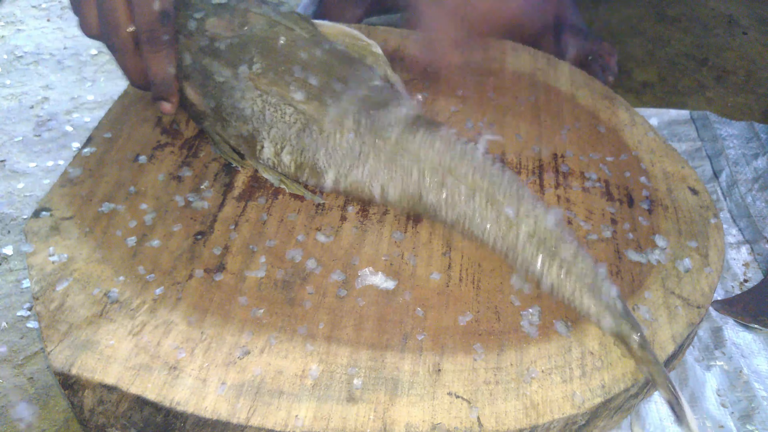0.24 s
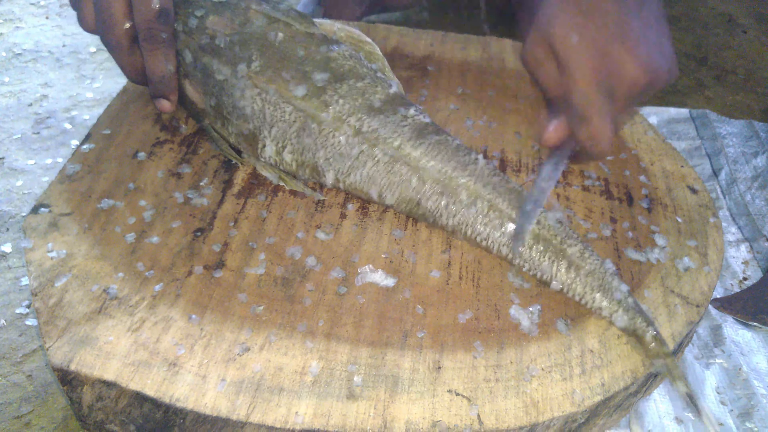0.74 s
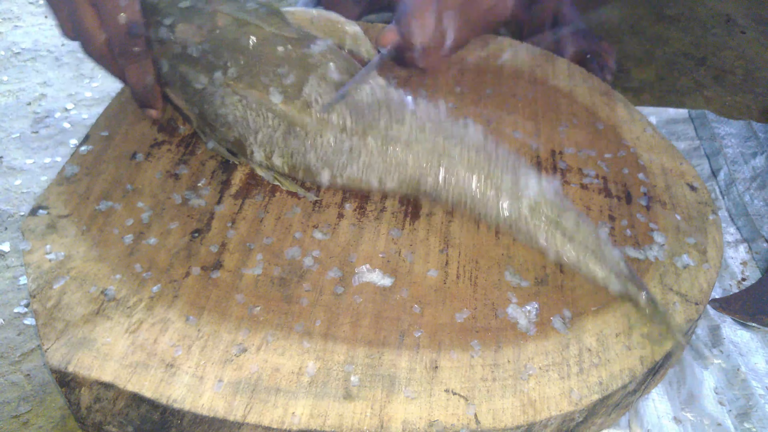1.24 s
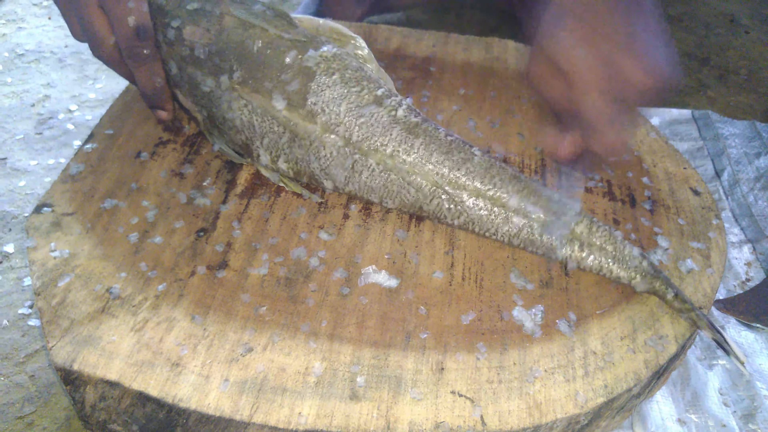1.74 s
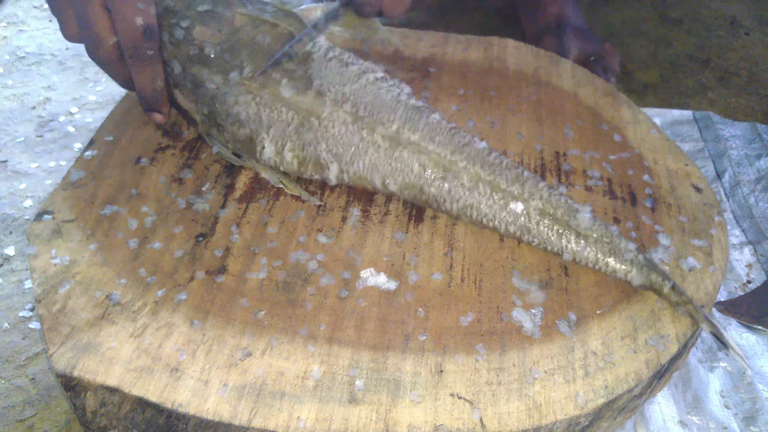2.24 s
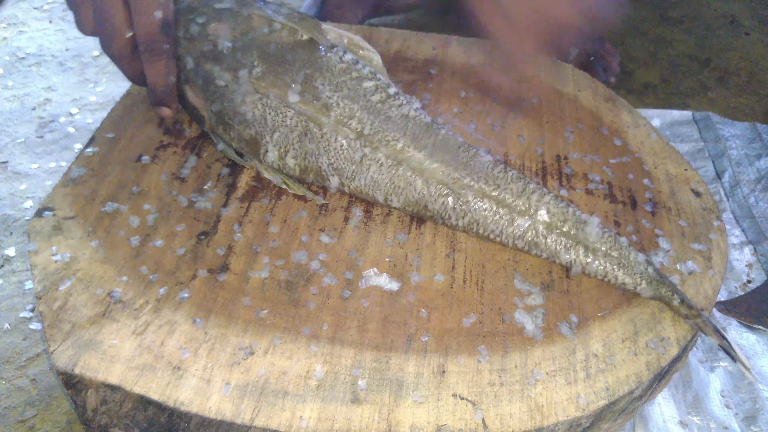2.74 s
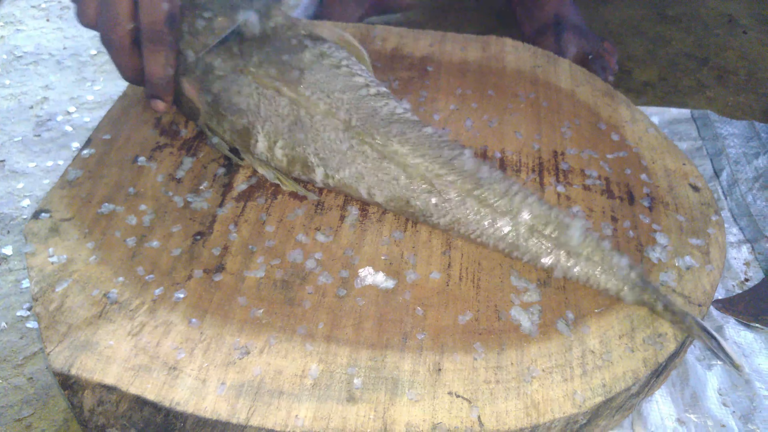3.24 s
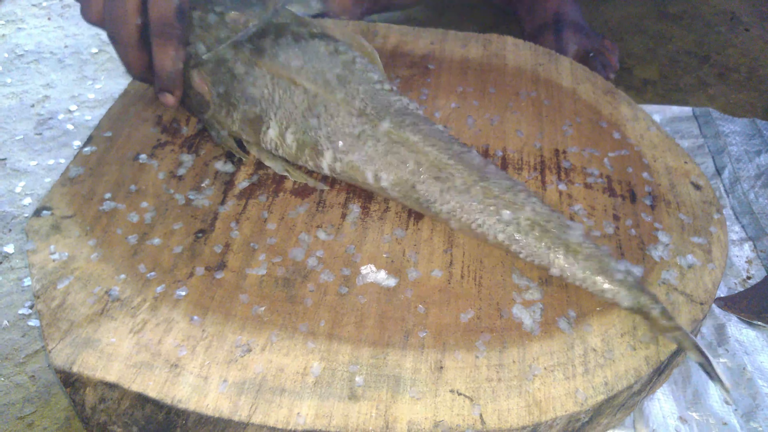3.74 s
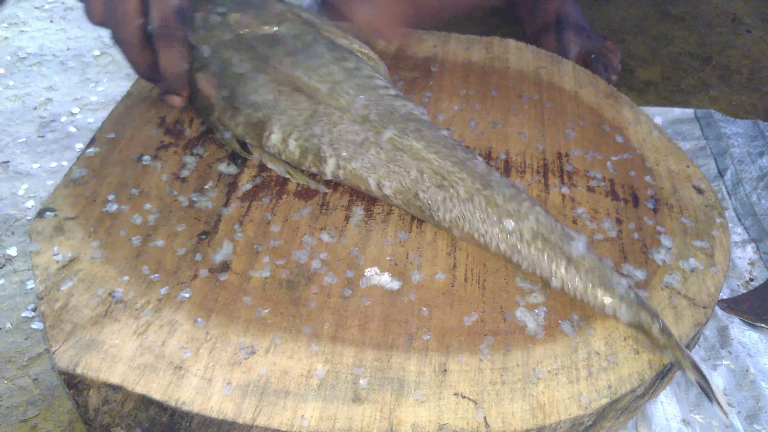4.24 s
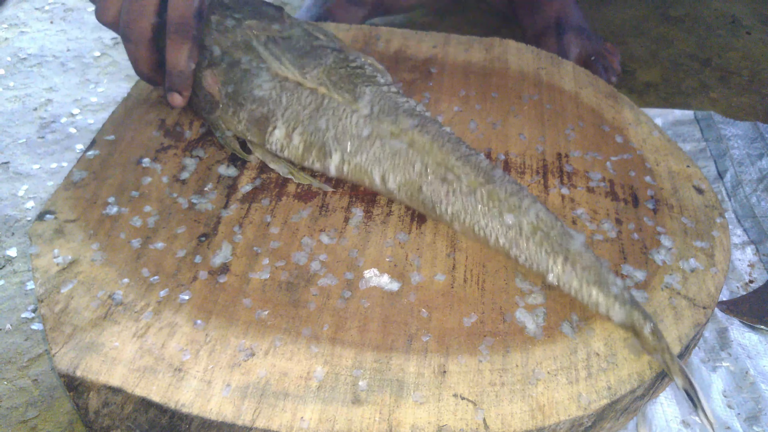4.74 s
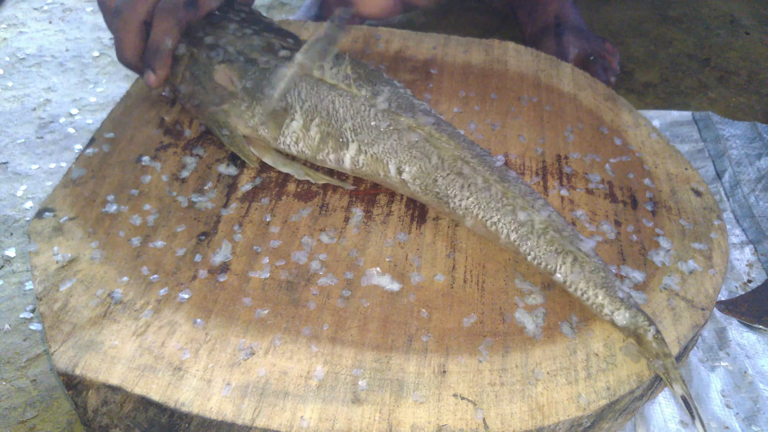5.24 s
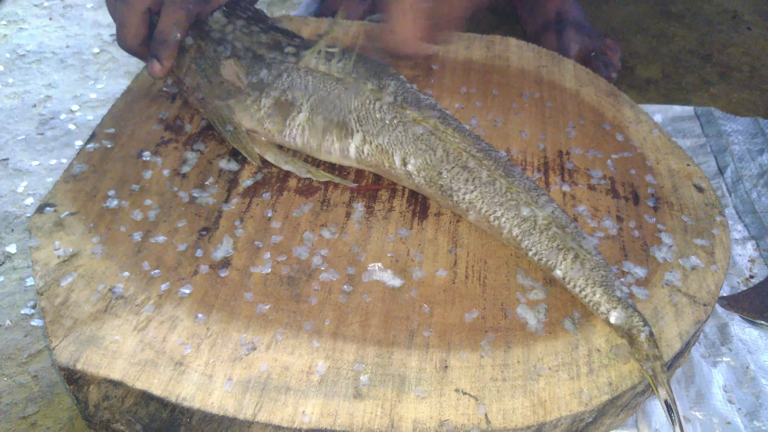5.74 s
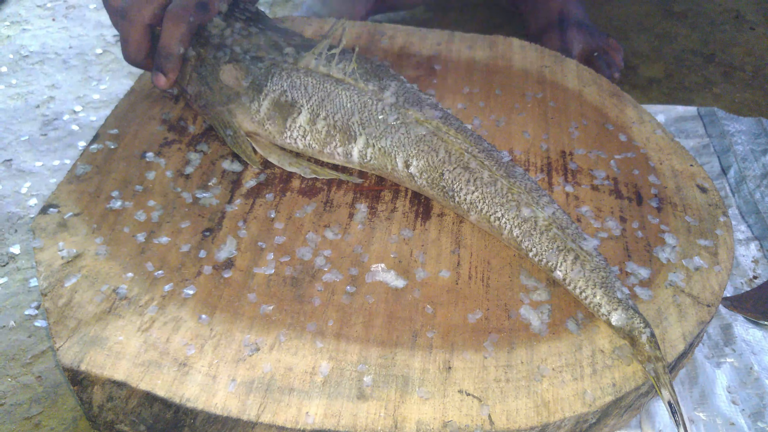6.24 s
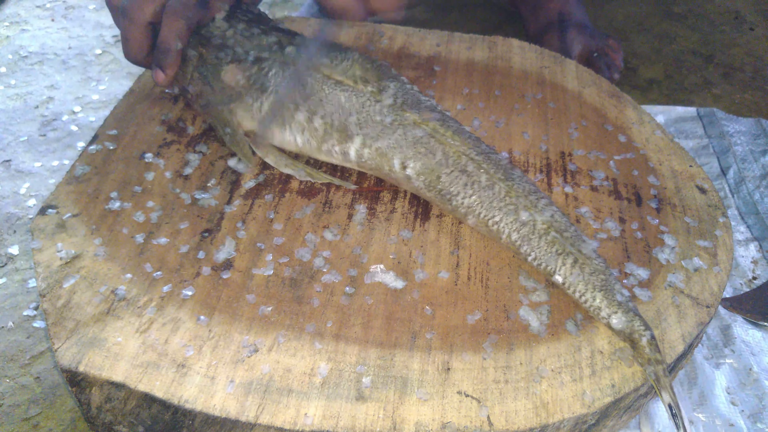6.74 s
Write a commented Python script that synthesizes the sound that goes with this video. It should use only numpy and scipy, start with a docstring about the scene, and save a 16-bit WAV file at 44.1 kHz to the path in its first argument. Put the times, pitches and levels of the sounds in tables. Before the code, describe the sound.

Brisk, dry, crackling scrapes begin at once: each swells, bites for a moment and releases, followed by a lighter, smoother slide back. The wooden block answers with short low knocks and muffled grumbling, while individual scales click sharply. Near the end come knocks, a gap with soft rubbing, and two last gritty pulls. Near, wide stereo microphones outdoors, little echo, quiet bassy air behind.

```python
"""Outdoors, at a thick wooden block: a blade scrapes scales off a fish, about three strokes a second.
Tearing scales are dense noise grains and short ticks; the same strokes drive a dull noise in the block.
Landings of the blade ring the block's modes; single scales snap as a click over a sagging twang.
Rubbing and air are coloured noise. Two spaced microphone ports hear it; the recorder widens the
stereo picture by a delayed cross-feed."""
import sys
import numpy as np
from scipy import signal
from scipy.fft import rfft, irfft, next_fast_len
from scipy.io import wavfile
from scipy.ndimage import uniform_filter1d, map_coordinates

SR = 44100
rng = np.random.default_rng(int(sys.argv[2]) if len(sys.argv) > 2 else 0)


def persist_wave(psi):
    """Save psi, clipped to +-1, as 16-bit WAV."""
    counts = np.round(np.clip(psi, -1, 1) * 32767).astype(np.int16)
    wavfile.write(sys.argv[1], SR, np.atleast_2d(counts).T)


N = 307818

# Pulls against the scales. Each row: full bite in seconds, rise in seconds per RAMP_DB, hold in seconds,
# crackle at the end of the hold in dB, swell over the hold in dB, treble in dB before the bite darkens it,
# block share in dB before a common trim.
PULL_ROWS = [(0.066, 0.073, 0.045, -29, 4, 4, -3.5), (0.33, 0.048, 0.048, -28, 5, 6, -2),
             (0.616, 0.037, 0.063, -33.5, 3.5, 3.5, -3), (0.92, 0.07, 0.092, -36.5, 3.5, 5.5, -3.5),
             (1.263, 0.046, 0.048, -36, 0.5, 7, -4), (1.549, 0.053, 0.075, -32.5, 4.5, 6, -2.5),
             (1.879, 0.09, 0.12, -34, -2.5, 3, -1.5), (2.244, 0.086, 0.071, -28.5, -2.5, 4.5, 0.5),
             (2.59, 0.083, 0.051, -26, 4, 4, -4), (2.652, 0.015, 0.0089, -30, -7, 3, -1.5),
             (2.934, 0.073, 0.065, -32.5, -2.5, 2.5, -3.5), (3.243, 0.022, 0.077, -31.5, 7, 3, -2),
             (3.557, 0.12, 0.027, -36, 0.5, 7.5, -3), (3.774, 0.055, 0.0086, -33.5, -3.5, 7, -1.5),
             (3.995, 0.12, 0.013, -29.5, 8.5, 3, 1), (4.214, 0.024, 0.038, -35, 3, 7.5, -0.5),
             (4.459, 0.052, 0.02, -31.5, 0.5, 7.5, 3.5), (4.758, 0.0061, 0.074, -42.5, -9.5, -3.5, -1),
             (5.136, 0.043, 0.058, -37, -2.5, -1, -1.5), (5.494, 0.014, 0.052, -42, 5.5, 7.5, -3),
             (5.849, 0.044, 0.051, -32, 8, 3, -3.5), (6.585, 0.093, 0.057, -31, 7.5, -2, -10),
             (6.847, 0.12, 0.028, -32.5, 8.5, 1, -5)]
# Light slides back along the fish. Each row: start of hold in seconds, hold in seconds, crackle in dB,
# treble in dB and block share in dB, as for the pulls.
SLIDE_ROWS = [(0.203, 0.063, -48.5, 8, -7), (0.488, 0.045, -46.5, 5, -3), (0.739, 0.086, -47, 0, -7.5),
              (0.803, 0.042, -53.5, 19, 12), (1.094, 0.052, -55.5, 17.5, 2), (1.437, 0.043, -47, 5.5, 0),
              (1.724, 0.061, -49, 14, 8.5), (2.051, 0.097, -46.5, 7.5, -1), (2.4, 0.12, -48.5, 5.5, -21),
              (2.767, 0.085, -51.5, 14, -10), (3.044, 0.13, -49.5, 1, -23), (3.411, 0.039, -44.5, 3, -8),
              (3.671, 0.035, -48.5, 11.5, -1), (3.873, 0.023, -44, 6, -10), (4.096, 0.051, -50.5, 16, -19),
              (4.332, 0.057, -48.5, 10.5, -6), (4.591, 0.078, -45.5, 5, -21), (4.697, 0.034, -45, -2, 2),
              (4.82, 0.092, -48, 1, -5), (5.309, 0.011, -42, -4, 1), (6.432, 0.19, -58.5, 8, 14),
              (6.724, 0.031, -47, 1, -24)]
# Landings of the blade. Each row: start in seconds, level in dB and hardness in dB, before common trims.
KNOCK_ROWS = [(0.227, -8, -9.5), (0.491, -14.5, -4.5), (0.715, -24, -20), (1.111, -22.5, -21),
              (1.233, -19.5, -17), (1.441, -9, -10.5), (1.7271, -6, -11), (2.079, -10, -17),
              (2.186, -7, -14), (2.357, -18.5, 0.5), (2.419, -10.5, -12.5), (2.524, -21, -8),
              (2.702, -21, -26), (2.798, -17, -23.5), (3.142, -13.5, -14), (3.31, -17, -21),
              (3.471, -17.5, -20), (3.71, -11.5, -12), (3.816, -21, -14), (3.928, -18, -17.5),
              (4.037, -18, -1.5), (4.155, -21.5, -23), (4.377, -15, -21), (4.653, -13.5, -16),
              (4.927, -17.5, -21.5), (5.322, -7.5, 6), (5.337, -9, -20.5), (5.383, -16.5, -14),
              (5.666, -8, -6), (5.678, -12.5, -9), (5.716, -16.5, -14), (6.76, -17.5, -11)]
# Single scales snapping. Each row: start in seconds, level in dB before a common trim, nominal pitch in Hz,
# click over twang in dB before a common trim, nominal decay by 60 dB in seconds.
SNAP_ROWS = [(0.073, -8.5, 3140, 13, 0.0052), (0.089, -14.5, 805, 17, 0.022),
             (0.093, -17, 3900, 18, 0.0048), (0.112, -25, 3620, 15, 0.0045),
             (0.1303, -12, 3700, 19.5, 0.0082), (0.324, -23, 3820, 20, 0.0068),
             (0.344, -17, 3660, 22, 0.0059), (0.386, -18, 3500, 23, 0.0066),
             (0.747, -22.5, 3600, 7, 0.0091), (0.8253, -17.5, 1530, 13, 0.0074),
             (0.8414, -0.5, 1317, 12, 0.0058), (0.8472, -15, 1190, 9, 0.0058),
             (1.24, -31, 3460, 22.5, 0.007), (1.302, -20, 3600, 13, 0.0066),
             (1.541, -21.5, 830, 15.5, 0.0061), (1.841, -16.5, 3200, 12, 0.0048),
             (1.893, -24, 794, 13.5, 0.0054), (1.98, -16, 3300, 12, 0.0052), (1.988, -18, 3600, 8, 0.0046),
             (2.318, -18, 840, 23, 0.0095), (2.945, -14.5, 3540, 26.5, 0.0078),
             (2.996, -13, 3430, 22.5, 0.011), (3.051, -24.5, 3500, 20, 0.011),
             (3.242, -27.5, 3500, 27, 0.0042), (3.314, -16.5, 860, 23, 0.014),
             (3.563, -13, 5800, 20, 0.0054), (3.581, -15.5, 5670, 15, 0.0074),
             (3.755, -34, 910, 11, 0.0078), (3.782, -11, 6030, 16, 0.009), (3.867, -10.5, 3150, 7, 0.0094),
             (4.214, -22.5, 3600, 17, 0.0075), (4.247, -20, 900, 25, 0.0089),
             (4.448, -13.5, 1490, 14, 0.0075), (4.505, -10, 6300, 17.5, 0.007),
             (4.761, -19.5, 1290, 20.5, 0.01), (4.822, -21, 1220, 18, 0.013), (5.128, -21, 2950, 5, 0.0074),
             (5.155, -18.5, 4100, 11, 0.0062), (5.268, -24, 3440, 18, 0.0084),
             (5.285, -25, 3200, 14.5, 0.0068), (5.542, -29, 3440, 26.5, 0.0094),
             (5.899, -13, 3830, 16, 0.012), (5.932, -24, 826, 25, 0.014), (6.575, -21, 3640, 10, 0.0092),
             (6.596, -15.5, 3470, 14, 0.01), (6.6, -12, 780, 19.5, 0.0096), (6.632, -13, 3500, 22, 0.0075),
             (6.87, -11.5, 3080, 8, 0.015), (6.884, -17.5, 880, 28.5, 0.0043)]
# Fish and hand shifting on the block. Each row: time in seconds, level in dB.
RUBBING_LEVEL = [(0.0, -32), (0.09, -45), (0.78, -57), (1.34, -50.5), (1.79, -41), (2.41, -39),
                 (2.82, -41.5), (2.99, -47.5), (3.96, -49.5), (4.29, -41), (4.72, -53.5), (4.86, -44.5),
                 (5.23, -41.5), (5.52, -57), (6.02, -40), (6.18, -45), (6.46, -40), (6.73, -44),
                 (6.98, -58)]
# Block modes, low to high. Each row: mean pitch in Hz, level in dB before tilt and scatter, t60 in seconds.
BLOCK_MODES = [(108, -5.5, 0.14), (209.7, 7.5, 0.06), (285.7, 1, 0.059), (363, 1, 0.033), (494.2, 1, 0.17),
               (537, -21, 0.17), (613, -23, 0.12), (748, -12, 0.08)]
# Short slap and high modes of a hard landing. Each row: as for the block modes.
EDGE_MODES = [(463, 12.5, 0.0068), (1020, -11.5, 0.015), (1230, -10, 0.0073), (1530, -7, 0.013),
              (2210, -9, 0.0084)]
# Noise spectra of tearing scales, block, rubbing and air. Each row: frequency in Hz, relative dB per Hz.
CRACKLE_SPECTRUM = [(300, -29), (900, 0), (1600, -2.5), (2500, -3), (3600, 0.5), (5000, -5.5), (6000, -10),
                    (9000, -11), (12500, -13.5), (15000, -21)]
BODY_SPECTRUM = [(50, -70), (100, 8.5), (200, 2), (500, 5), (850, -2.5), (1300, -13.5), (2200, -25.5),
                 (4000, -107)]
RUBBING_SPECTRUM = [(40, -7), (100, 5.5), (250, 0), (500, -6), (1000, -12.5), (1800, -20), (4000, -40)]
AIR_SPECTRUM = [(30, -22), (100, 15.5), (500, -7), (1500, -16.5), (3500, -14), (7000, -18.5), (15000, -31)]
# Likeness of the two ports. Each row: frequency in Hz, likeness from 0 to 1.
PORT_LIKENESS = [(60, 0.91), (550, 0.95), (1000, 0.5), (1700, 0.59), (2300, 0.31), (2700, 0.36),
                 (3800, 0.42), (4800, 0.35), (5400, 1), (6500, 0.083), (15000, 0.08)]
# Level difference of the ports. Each row: frequency in Hz, left minus right in dB.
PORT_TILT = [(60, -4), (500, -2.5), (1050, -4.5), (1500, 7), (2250, -5), (2600, 9), (3800, -5), (6000, -5),
             (15000, -2.5)]
# Phase difference of the ports. Each row: frequency in Hz, lead of the left in radians.
PORT_LEAD = [(500, 0.32), (700, 0.61), (1400, 1.57), (2070, 4.9), (2600, 7.6), (3450, 4.77), (3800, 3.46),
             (4450, 1.97)]
# Cross-feed. Each row: frequency in Hz, share of the other side taken away.
CROSS_SHARE = [(100, 0.47), (1200, 0.39), (2540, 0.9), (3700, 0.82), (5000, 0.31), (6200, 0.23),
               (7500, 0.28), (15000, 0.52)]

CROSS_DELAY_S, CROSS_LEAD_CYCLES, TOP_HZ = 17.9 / 44100, .03, 15850
RAMP_DB = 30  # span of every rise and release time
PULL_RELEASE_S, SLIDE_RISE_S, SLIDE_RELEASE_S, SLIDE_SWELL_DB = 0.15, 0.043, 0.042, -1.5
LET_GO_DB, LET_GO_S = 4.5, 0.0067  # extra drop just after the blade leaves the scales
RESTING_DB, RESTING_BLOCK_DB = -63, 4  # blade off the fish
TILT_PER_HARD_DB, USUAL_HARD_DB = 0.42, -20  # dB an octave per dB of hardness
SNAP_SAG = 0.14  # share of pitch lost in each half t60
SNAP_LEFT_DB, SNAP_LAG_S = -1, 0.000207  # scales snap nearer the right port


def scraping():
    """Scales tear loose as dense grains and ticks; a hard pull is grainy and bright, a slide smooth and dull."""
    crackle_db, treble_db, block_db = stroke()
    bite = np.clip((crackle_db + 58.0) / 22, .15, 1)
    unsteady = amp(2 * wobble(60) + 2 * wobble(30))
    tearing = unit(grains(2400, spread_db=3.5, life_s=.0007) * unsteady) ** bite
    jerks = grains(600, spread_db=4.0, life_s=0.0058)
    crackle = patchy(coloured(tearing, CRACKLE_SPECTRUM), depth_db=3)
    flicks = ticks(count=4000, centre_hz=3500, octaves=.9, cycles=2.5, spread_db=4.5)
    crackle = unit(crackle + .85 * bite * flicks)
    fizz = filtered(crackle, lambda hz: 1 / (1 + (4600 / (hz + 1)) ** 6))  # above about 4.6 kHz
    fizz_gain = amp(treble_db - 13.8 * (1 - bite) + 2.04 * wobble(32))
    crackle = amp(crackle_db) * (crackle + (fizz_gain - 1) * fizz)
    block = amp(crackle_db + block_db + 2.0) * coloured(jerks, BODY_SPECTRUM)
    return crackle + block


def stroke():
    """Every pass rises, holds and releases; powers add, and weight the treble and block share."""
    rows = [(s, rise, hold, PULL_RELEASE_S, *rest) for s, rise, hold, *rest in PULL_ROWS]
    rows += [(s, SLIDE_RISE_S, hold, SLIDE_RELEASE_S, db, SLIDE_SWELL_DB, *rest)
             for s, hold, db, *rest in SLIDE_ROWS]
    t = np.arange(0, N, 32) / SR
    s, rise, hold, release, db, swell_db, treble_db, block_db = np.transpose(rows)[:, :, None]
    hold = np.maximum(hold, .002)
    ramps = np.maximum(np.maximum((s - t) / rise, (t - s - hold) / release), 0)
    swell = swell_db * (np.clip((t - s) / hold, 0, 1) - 1.0)
    let_go = LET_GO_DB * np.clip((t - s - hold) / LET_GO_S - 1, 0, 1)
    power = amp(db + swell - RAMP_DB * ramps - let_go) ** 2
    rest = amp(RESTING_DB) ** 2
    total = power.sum(0) + rest
    treble = (power * treble_db).sum(0) / total
    block = ((power * block_db).sum(0) + rest * RESTING_BLOCK_DB) / total
    return curves(np.transpose([t, 10 * np.log10(total), treble, block]))


def ticks(count, centre_hz, octaves, cycles, spread_db):
    """Small scales flick free at random, each a few cycles at its own pitch; rms 1."""
    where, size, left, right = rng.random((count, 4)).T[:, :, None]
    hz = np.clip(centre_hz * 2 ** (octaves * rng.standard_normal((count, 1))), 600, 14000)
    k = np.arange(200)
    shape = amp(spread_db * -np.log(size + .05)) * np.exp(-k * hz / SR / cycles)
    index = ((where * N).astype(int) + k).ravel()
    pair = []
    for turn in (left, right):  # unrelated phases at the two ports
        waves = shape * np.sin(2 * np.pi * (k * hz / SR + turn))
        side = np.bincount(index, waves.ravel())[:N]
        pair.append(np.pad(side, (0, N - len(side))))
    return unit(filtered(np.array(pair), lambda f: amp(along(CRACKLE_SPECTRUM, f) / 2)))


def knocks():
    """The block rings; about 11 ms after each landing its upper modes drop 9 dB within 11 ms; a rumble follows."""
    out, t = np.zeros((2, N + SR)), np.arange(SR // 4) / SR
    upper_drop = amp(-9 * np.clip((t - .011) / 0.011, 0, 1))
    rise = 1 - np.exp(-t / .001)
    rumble = np.zeros(N + SR)
    for s, db, hard_db in KNOCK_ROWS:
        start = round(s * SR)
        tilt_db = TILT_PER_HARD_DB * (hard_db - USUAL_HARD_DB)  # softer landings favour deep modes
        deep = ring(BLOCK_MODES[:3], t, scatter_db=2, tilt_db=tilt_db)
        upper = ring(BLOCK_MODES[3:], t, scatter_db=2, tilt_db=tilt_db)
        edge = amp(hard_db + 6.0) * ring(EDGE_MODES, t, scatter_db=2.5)
        out[:, start:][:, :len(t)] -= amp(db - 9.0) * rise * (deep + upper * upper_drop + edge)
        rumble[start:][:len(t)] += amp(db - 19.5 - 60 * t / 0.22) * rise
    return out[:, :N] + rumble[:N] * coloured(amp(0.77 * wobble(65)), BODY_SPECTRUM)


def ring(modes, t, scatter_db, tilt_db=0):
    """A struck body as decaying sines: random strengths for each port, slightly random common pitches."""
    hz, db, t60 = np.transpose(modes)[:, :, None]
    level = db + tilt_db * np.log2(hz / 500) + scatter_db * rng.standard_normal((2, len(modes), 1))
    hz = hz * (1 + .015 * rng.standard_normal(hz.shape))
    return np.sum(amp(level - 60 * t / t60) * np.sin(2 * np.pi * hz * t), axis=1)


def snaps():
    """Each scale twangs for milliseconds at a sagging pitch under a dry click; the right port hears it first."""
    click, twang = np.zeros((2, N + SR)), np.zeros((2, N + SR))
    t = np.arange(SR // 25) / SR
    for s, db, hz, click_db, t60 in SNAP_ROWS:
        start = round(s * SR)
        dying = amp(-60 * (t / t60) ** 1.4) * (1 - np.exp(-t / .00015))
        cycles = hz * (t + SNAP_SAG * (t60 / 4 * t - t ** 2) / t60)
        twang[:, start:][:, :len(t)] += amp(db - 4.5) * dying * np.sin(2 * np.pi * cycles)
        fading = amp(-60 * t / min(t60, .005)) * (1 - np.exp(-t / .0001))
        burst = fading * rng.standard_normal((2, len(t)))
        burst /= np.linalg.norm(burst, axis=1)[:, None]  # equal energy
        click[:, start:][:, :len(t)] += amp(db + click_db - 1.5) * burst

    def crisp(hz):
        """High-pass at 700 Hz, two low-passes at 6 kHz."""
        return 1j * hz / 700 / (1 + 1j * hz / 700) / (1 + 1j * hz / 6000) ** 2

    def left_later(hz):
        """Left port delayed and softer."""
        return np.array([amp(SNAP_LEFT_DB) * np.exp(-2j * np.pi * hz * SNAP_LAG_S), hz ** 0])

    return filtered(twang[:, :N] + filtered(click[:, :N], crisp), left_later)


def rubbing():
    """Fish and hand shift unevenly on the wood: low noise with a wavering level and colour."""
    (rub_db,) = curves(RUBBING_LEVEL)
    uneven = amp(1.3 * wobble(12) + 1.5 * wobble(50))
    return amp(rub_db) * patchy(coloured(uneven, RUBBING_SPECTRUM), depth_db=1.4, size=1024)


def outdoor_air():
    """Nearly steady broadband noise, strongest in the bass."""
    return amp(-51.5) * coloured(amp(0.56 * wobble(2.53)), AIR_SPECTRUM)


def ports(pair):
    """Bass arrives alike at both ports, most treble by different paths; the left port is nearer."""
    sign = np.array([[1], [-1]])

    def mix(hz):
        """Common and differing shares that give the likeness."""
        turn = np.arccos(np.clip(along(PORT_LIKENESS, hz), -1, 1)) / 2
        return np.array([np.cos(turn), np.sin(turn)])

    def place(hz):
        """Half the level and phase difference to each side."""
        return amp(sign * along(PORT_TILT, hz) / 2) * np.exp(.5j * sign * along(PORT_LEAD, hz))

    common, apart = filtered(pair, mix)
    return filtered(np.array([common + apart, common - apart]), place)


def amp(db):
    """dB to amplitude."""
    return 10 ** (np.asarray(db) / 20)


def unit(x):
    """x at rms 1."""
    return x / np.sqrt(np.mean(x ** 2) + 1e-20)


def along(points, hz):
    """Rows of (Hz, value) interpolated on a log axis."""
    f, v = np.transpose(points)
    return np.interp(np.log(hz + 1), np.log(f + 1), v)


def curves(rows):
    """One value per sample for each column after the time."""
    s, *cols = np.transpose(rows)
    return [np.interp(np.arange(N) / SR, s, c) for c in cols]


def wobble(rate_hz):
    """A smooth random curve, rate_hz knots a second."""
    knots = rng.standard_normal(int(N * rate_hz / SR) + 4)
    return map_coordinates(knots, [np.arange(N) * rate_hz / SR])


def filtered(x, response):
    """x times a complex response of frequency."""
    m = next_fast_len(N + SR // 2)
    return irfft(rfft(x, m) * response(np.fft.rfftfreq(m, 1 / SR)), m)[..., :N]


def coloured(envelope, spectrum):
    """Two unrelated noises under one envelope, rms 1."""
    return unit(filtered(envelope * rng.standard_normal((2, N)), lambda hz: amp(along(spectrum, hz))))


def grains(per_s, spread_db, life_s):
    """Envelope of random short bursts, a few of them much larger than the rest."""
    sizes = amp(spread_db * np.minimum(rng.exponential(size=N), 4))
    starts = (rng.random(N) < per_s / SR) * sizes
    return signal.lfilter([1], [1, -np.exp(-1 / (life_s * SR))], starts)


def patchy(x, depth_db, size=256):
    """Colour shifts by random gain patches, 900 Hz by 20 ms at size 256, narrower and slower if larger; rms 1."""
    z = signal.stft(x, nperseg=size)[2]
    field = uniform_filter1d(rng.standard_normal(z.shape[1:]), size=5, axis=0)
    field = uniform_filter1d(field, size=7, axis=1)
    return unit(signal.istft(z * amp(depth_db * unit(field)), nperseg=size)[1][:, :N])


def scene():
    """Snaps carry their own port difference; all else passes through the ports."""
    return ports(scraping() + knocks() + rubbing() + outdoor_air()) + snaps()


def record(dry):
    """Each side loses a delayed share of the other, which combs the middle; deep bass and the top are cut."""
    def cross(hz):
        """Share, delay and small phase lead of the cross-feed."""
        return along(CROSS_SHARE, hz) * np.exp(-2j * np.pi * (hz * CROSS_DELAY_S - CROSS_LEAD_CYCLES))

    wide = dry - filtered(dry[::-1], cross)
    lean = signal.sosfilt(signal.butter(3, 75, "high", fs=SR, output="sos"), wide)
    return filtered(lean, lambda hz: hz < TOP_HZ)


dry = scene()
out = record(dry)
persist_wave(out)
```